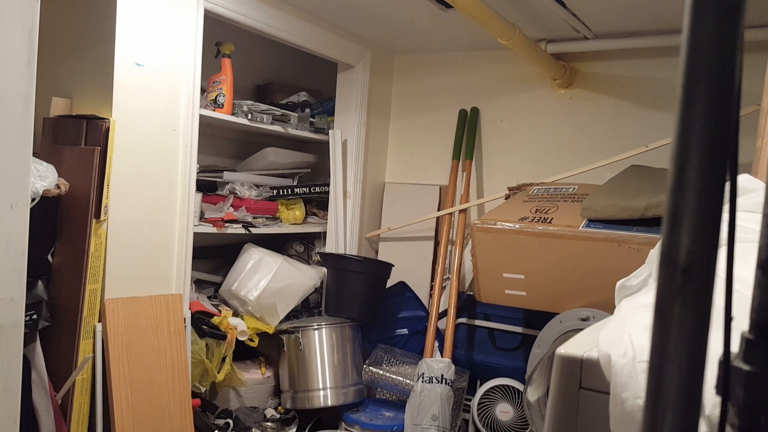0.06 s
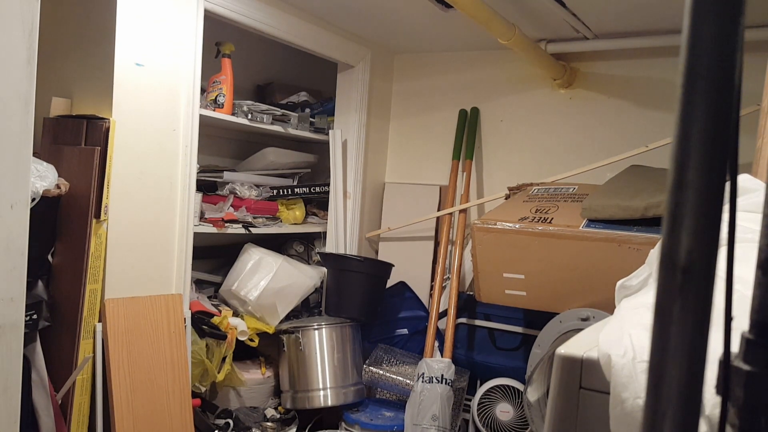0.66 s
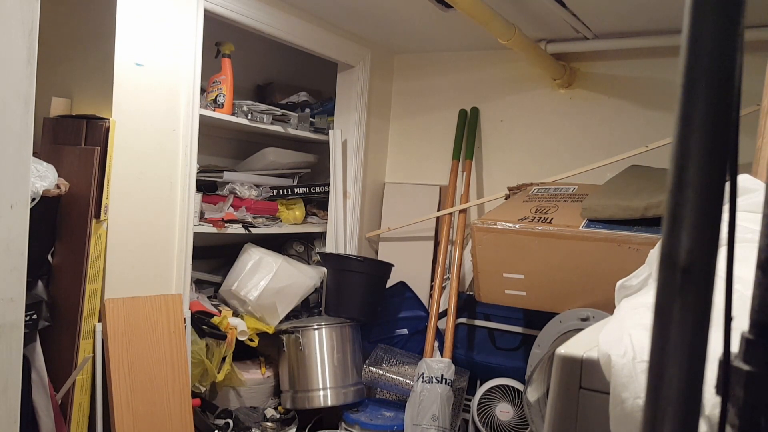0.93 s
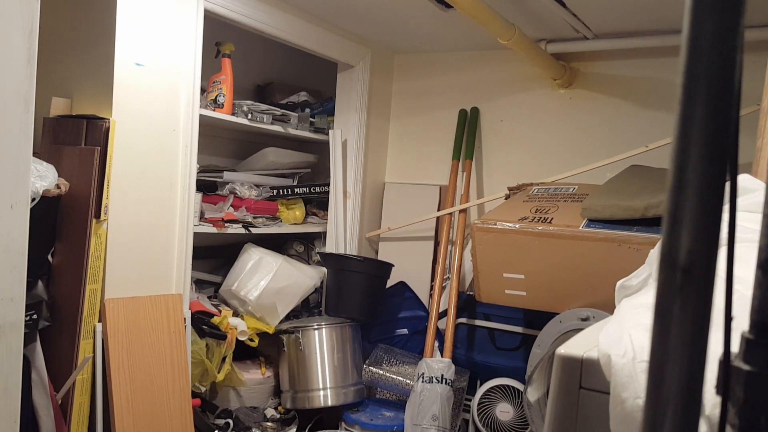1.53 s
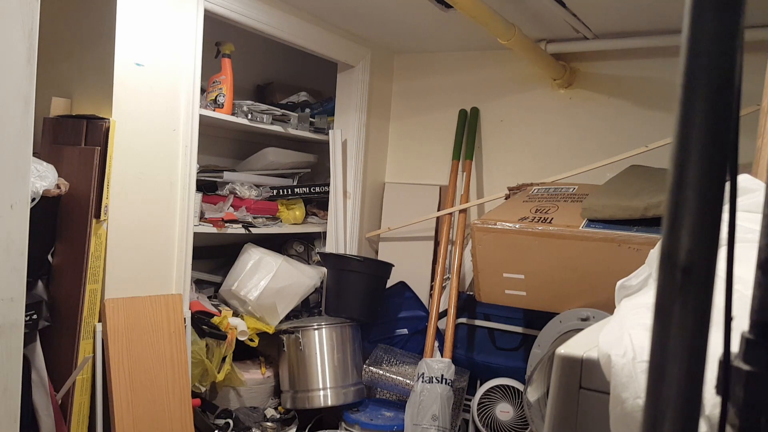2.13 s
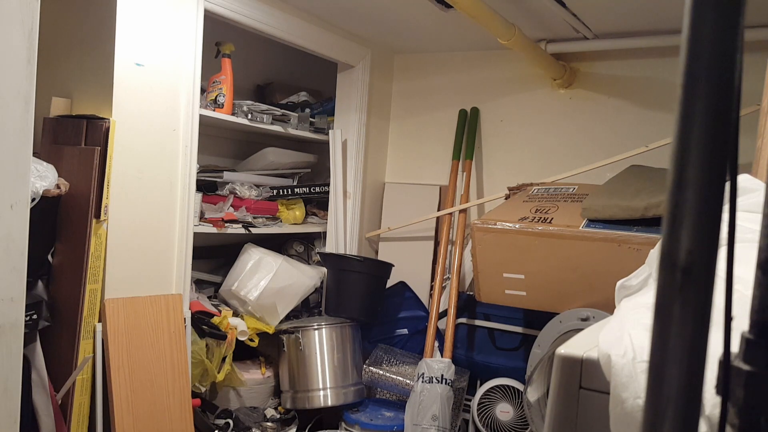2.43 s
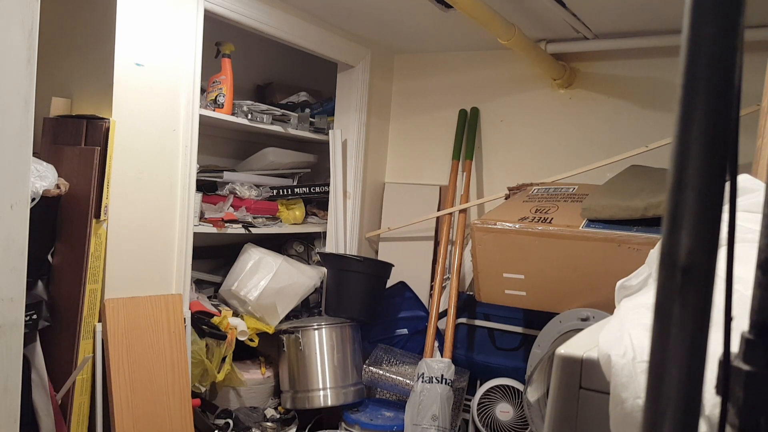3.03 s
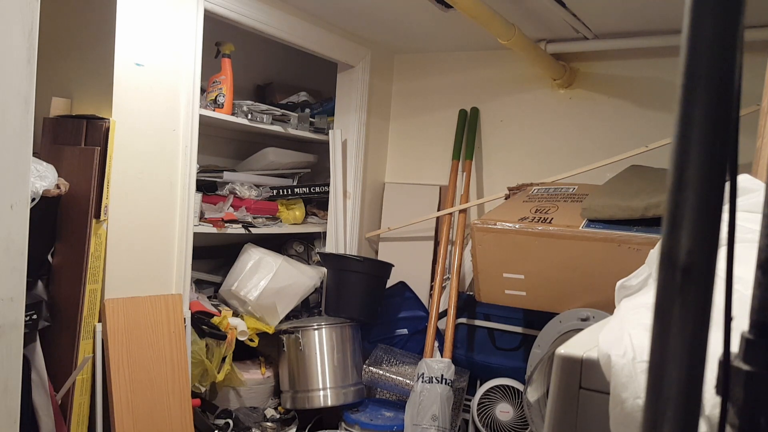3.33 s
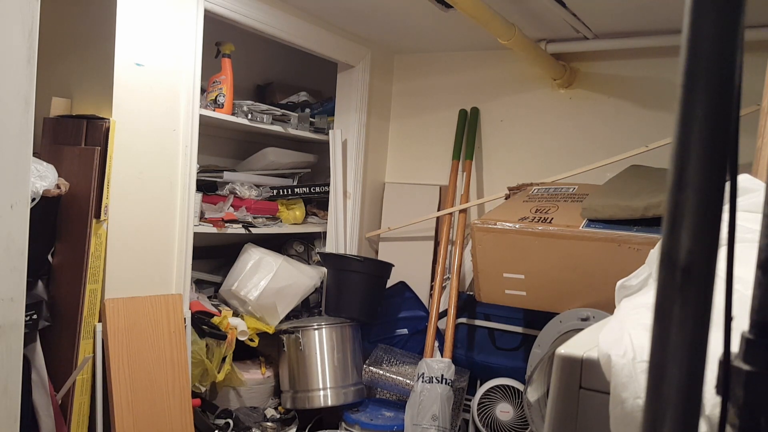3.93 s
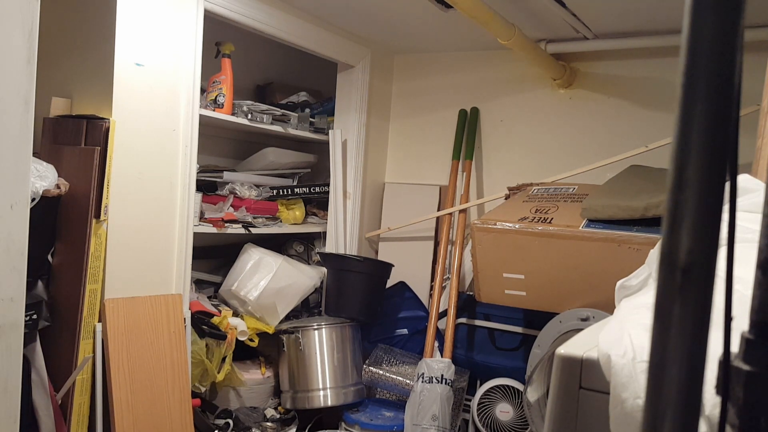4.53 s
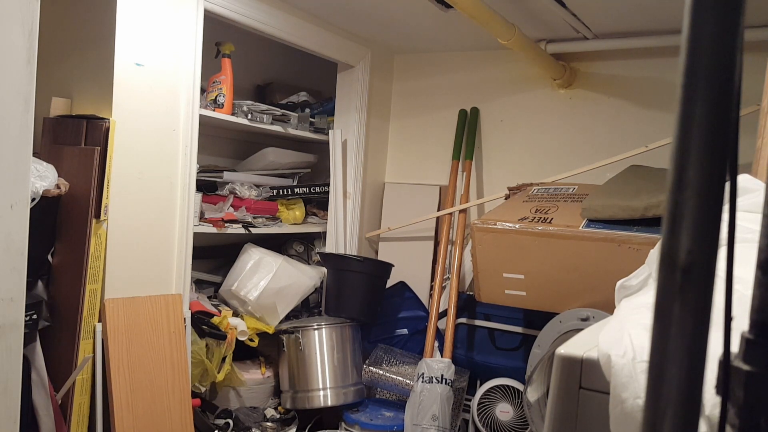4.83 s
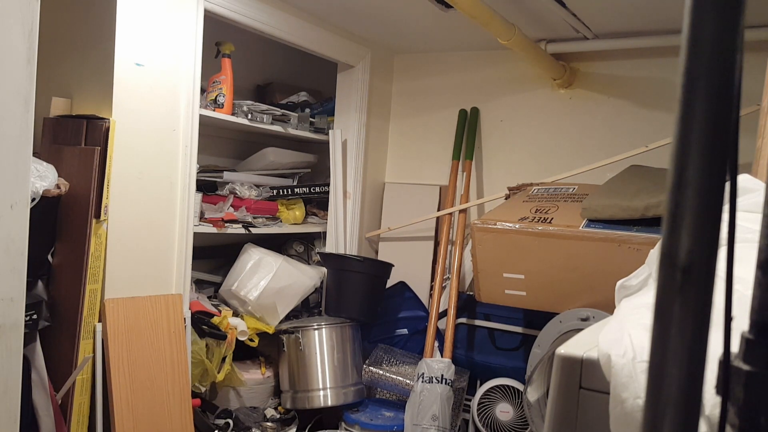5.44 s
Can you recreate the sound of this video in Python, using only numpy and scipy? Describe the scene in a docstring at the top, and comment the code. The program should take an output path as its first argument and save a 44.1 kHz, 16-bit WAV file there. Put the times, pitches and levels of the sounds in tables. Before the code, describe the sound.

Steady low rumble and hum of a laundry machine, its load thudding softly, with a faint rustle and a few ticks nearby.

```python
"""A laundry machine runs steadily in a cluttered basement.
Its tumbling load drives the cabinet into a low rumble, and impacts excite the drum's damped modes as
thuds and knocks. Panels resonate, the motor hums at harmonics of its shaft rate, air rushes under a thin
whine, and a turning part rubs twice a round. Nearby, friction makes cloth rustle early on; there are
a few faint scuffs and ticks, and later a short stick-slip scrape."""
import sys
import numpy as np
from scipy import signal
from scipy.fft import rfft, irfft
from scipy.io import wavfile
from scipy.ndimage import uniform_filter1d

SR = 44100
rng = np.random.default_rng(int(sys.argv[2]) if len(sys.argv) > 2 else 0)


def master(y):
    """Save y as 16-bit WAV."""
    cut = np.clip(np.atleast_2d(y).T, -1, 1)
    pcm = np.round(cut * 32767)  # scale
    wavfile.write(sys.argv[1], SR, pcm.astype(np.int16))


N = 250488
TIME = np.arange(N) / SR
FREQS = np.maximum(np.arange(N // 2 + 1) * SR / N, 1)


def from_db(db):
    """Amplitude ratio of a level in decibels."""
    return 10 ** (np.asarray(db) / 20)


def unit_rms(x):
    """Normalisation to an rms of 1."""
    return x / np.sqrt(np.mean(x ** 2) + 1e-20)


def over_hz(points):
    """Interpolation of (frequency, value) points on a log-frequency axis."""
    hz, value = np.transpose(points)
    return np.interp(np.log(FREQS), np.log(hz), value)


def colour(points):
    """Spectral envelope through (frequency, level) points, with steep skirts outside them."""
    skirts = np.minimum(FREQS / points[0][0], 1) * np.minimum(points[-1][0] / FREQS, 1)
    return from_db(over_hz(points)) * skirts ** 6


def pan(balance_db):
    """Channel gains for a level difference, left minus right."""
    return from_db(np.array([[.5], [-.5]]) * balance_db)


def resonance(hz, width_hz):
    """Frequency response of a damped oscillator, 1 at its peak."""
    return 1 / (1 + 1j * (FREQS ** 2 - hz ** 2) / (FREQS * width_hz))


def ringing(modes):
    """Power sum of the responses of (frequency, bandwidth, level) modes, as a gain."""
    return np.sqrt(sum(np.abs(from_db(db) * resonance(hz, width_hz)) ** 2 for hz, width_hz, db in modes))


def drift(rate_hz):
    """Random fluctuation: low-passed noise of rms 1."""
    return unit_rms(irfft(rfft(rng.standard_normal(N)) / (1 + (FREQS / rate_hz) ** 2) ** 2, N))


def swell(at, width):
    """Gaussian envelope; centre and standard deviation in seconds."""
    out, near = np.zeros(N), np.abs(TIME - at) < 6 * width
    out[near] = np.exp(-.5 * ((TIME[near] - at) / width) ** 2)
    return out


def strokes(rows):
    """Envelope of incoherent (time, width, level) strokes, which add in power."""
    return np.sqrt(sum((from_db(db) * swell(at, width)) ** 2 for at, width, db in rows))


# likeness of left and right in the room: (frequency [Hz], correlation [-1 to 1])
CORRELATION = [(60, .98), (125, .93), (160, .97), (290, .97), (400, .66), (600, .55), (900, .1),
               (1500, -.3), (2500, 0), (5000, .08), (15000, 0)]
# standing waves of the room: (frequency [Hz], phase lead of the left [rad])
PHASE_LEAD = [(45, 0.37), (85, 0.046), (108, 1), (150, 0.27), (300, 0), (370, 0), (500, 0)]
def room_noise(gain):
    """Reverberant field: shaped noise of rms 1, strongly correlated between channels only in the bass."""
    mid, side = rfft(rng.standard_normal((2, N)))
    alike = over_hz(CORRELATION)
    pair = np.sqrt(1 + alike) * mid + np.sqrt(1 - alike) * side * [[1], [-1]]
    standing_waves = np.exp(.5j * over_hz(PHASE_LEAD) * [[1], [-1]])
    return unit_rms(irfft(gain * standing_waves * pair, N))


def near_noise(gain, direct_db, lag_s=.00042):
    """Superposition of the reverberant field and a direct wave that reaches the left first; rms 1."""
    delay = np.exp(-2j * np.pi * FREQS * lag_s * [[0], [1]])
    direct = unit_rms(irfft(gain * delay * rfft(rng.standard_normal(N)), N))
    return unit_rms(room_noise(gain) + from_db(direct_db) * direct)


# brief dips of the rumble: (time [s], depth [dB])
LULLS = [(.83, 5), (1.0, 23), (3.15, 9), (3.63, 6), (4.32, 14), (4.49, 5), (5.04, 5), (5.22, 8), (5.4, 10)]
def tumble_db(roll_db=-41, swing_db=0.66, airborne_db=3, smother_db=1.5):
    """Amplitude modulation of the rumble: a random swing, dips around each fall, and a few lulls."""
    level = roll_db + swing_db * drift(9.4)
    heaviest_db = max(db for _, db, _ in THUDS)
    for at, db, _ in THUDS:
        weight = from_db(db - heaviest_db)
        level -= airborne_db * weight * swell(at - 0.06, 0.014)   # the lump is in the air
        level -= smother_db * weight * swell(at + 0.014, 0.0079)   # its landing smothers the rolling
    return level - sum(depth_db * swell(at, 0.012) for at, depth_db in LULLS)


# spectrum of cabinet and room rumble: (frequency [Hz], relative level [dB])
CABINET = [(13, -33), (22, -23.5), (68, 0.5), (86, 5), (112, -1), (142, -1), (182, -9), (221, -5),
           (269, -13), (290, -38), (380, -45), (640, -120)]
# stereo balance of rumble and air: (frequency [Hz], left minus right [dB])
BALANCE = [(105, 0), (125, 6.5), (175, 5), (250, -1.5), (500, 0), (1000, 4.5), (2200, 2), (3200, -0.4),
           (6200, 0.5), (10000, 4.5), (15000, 4)]
def rumble(steadiness=0.68, settle_s=0.0417):
    """Forced vibration: the rolling load shakes the cabinet without a break."""
    roll = room_noise(colour(CABINET) * pan(over_hz(BALANCE)))
    power = uniform_filter1d(np.mean(roll ** 2, axis=0), size=int(settle_s * SR))
    roll = roll / power ** (steadiness / 2)   # the weight of the load holds the level even
    return roll * from_db(tumble_db())


# panel and duct modes: (frequency [Hz], bandwidth [Hz], relative level [dB], left minus right [dB])
PANEL_MODES = [(87.7, 8.4, -52.5, 5), (133.3, 3.7, -52.5, 0.5), (157.7, 15, -61.5, 18.5),
               (213.7, 8.5, -52.5, 2), (245.2, 20.6, -53.5, 1.5), (384, 28, -70.5, 13.5),
               (579.4, 12, -71.5, 4.5), (820, 87, -68.5, 7), (862, 52, -66, -10), (1162, 24, -72, -3.5),
               (1280, 64, -73.5, -3), (1462, 33, -75.5, -8), (1789, 29, -74.5, 0), (2072, 43, -77.5, 3),
               (2190, 100, -76, 3.5), (2634, 27, -88, 3), (4305, 120, -80, 6), (4740, 190, -79, 2),
               (5250, 38, -83, -6), (6120, 40, -88, -2)]
def panels(level_db=1.0):
    """Resonance: under constant shaking, sheet metal and ducts ring in narrow bands."""
    power = 0
    for hz, width_hz, db, balance_db in PANEL_MODES:
        shape = np.abs(resonance(hz, 1.5 * width_hz)) ** 4   # 1.5 offsets the narrowing by the exponent
        power = power + shape / shape.mean() * (from_db(db) * pan(balance_db)) ** 2
    return from_db(level_db) * np.sqrt(power.mean()) * room_noise(np.sqrt(power))


# motor and fan tones: (order [shaft rates, rounded when played], rms level [dB], left minus right [dB])
HARMONICS = [(4, -53.5, 0.5), (8, -58.5, 5), (11.9, -57, 0.5), (13, -65, -7), (16, -74.5, 5), (20, -74, 9),
             (24, -77, -18.5), (32, -68.5, 9), (40, -66, -9), (44, -69, -7), (48, -77.5, -25),
             (59, -75.5, -9.5)]
def motor(shaft_hz=24.5, wander=0.00038, flutter_db=.7):
    """Harmonics of the shaft rotation; room paths give each a phase difference between left and right."""
    turns = np.cumsum(shaft_hz * (1 + wander * drift(2.1))) / SR
    out = np.zeros((2, N))
    for order, db, balance_db in HARMONICS:
        alike = np.interp(order * shaft_hz, *np.transpose(CORRELATION))
        offset = np.arccos(alike) * np.array([[.5], [-.5]])
        tone = np.sin(2 * np.pi * (round(order) * turns + rng.random()) + offset)
        out += np.sqrt(2) * tone * pan(balance_db) * from_db(db + flutter_db * drift(6.5))
    return out


def duct_ripple(depth_db=2.5, spacing_hz=25):
    """Modal overlap: crowded higher modes of the duct leave a fine, static ripple on the treble."""
    ripple = unit_rms(uniform_filter1d(rng.standard_normal(len(FREQS)), size=int(spacing_hz * N / SR)))
    return from_db(depth_db * ripple * np.minimum(FREQS / 1500, 1))


# spectrum of the airflow: (frequency [Hz], relative level [dB])
AIR = [(190, -28), (330, -3), (400, -3), (450, -6.5), (536, -7), (576, -6.5), (739, -5.5), (841, -1.5),
       (920, -6), (1010, -10), (1470, -8.5), (1650, -16.5), (2120, -14.5), (2920, -21.5), (4370, -25),
       (5600, -27), (7280, -66), (12300, -120)]
# spectrum of the thin hiss: (frequency [Hz], relative level [dB])
HISS = [(4000, 1.5), (5700, -6.5), (6250, 5), (7200, -1.5), (8200, -2.5), (10500, -3), (12700, -1.5),
        (14500, -2), (17000, -9)]
# the hiss eases off: (time [s], level [dB])
HISS_LEVEL = [(0, -66.5), (1.5, -68), (5.68, -69)]
def air(rush_db=-53.0):
    """Broadband flow noise: the fan drives air through its duct, with a faint hiss on top."""
    duct = pan(over_hz(BALANCE)) * duct_ripple()
    rush = from_db(rush_db) * room_noise(colour(AIR) * duct)
    hiss_db = np.interp(TIME, *np.transpose(HISS_LEVEL))
    return rush + from_db(hiss_db) * near_noise(colour(HISS) * duct, direct_db=-9.0)


def whine(level_db=-83.0, hz=13228, waver_hz=33, flutter_db=1.0):
    """Random frequency modulation: a thin, very high tone on the left wavers quickly."""
    tone = np.sqrt(2) * np.sin(2 * np.pi * np.cumsum(hz + waver_hz * drift(70)) / SR)
    return tone * from_db(level_db + flutter_db * drift(60)) * pan(balance_db=18)


def blows(rows, modes, level_db, vary_db):
    """Modal superposition: after each soft impact the modes build up and die away."""
    out, age = np.zeros(N + SR), np.arange(SR // 4) / SR
    for at, db, hz in rows:
        start = round(at * SR)
        for ratio, rise_s, mode_db in modes:
            shape = age / rise_s * np.exp(1 - age / rise_s)
            strength = from_db(level_db + db + mode_db + vary_db * (ratio - 0.5) * rng.normal())
            out[start:start + len(age)] += strength * shape * np.sin(2 * np.pi * ratio * hz * age)
    return out[:N]


# heavy falls of the load: (time [s], relative level [dB], pitch [Hz])
THUDS = [(0.005, -34, 99), (0.088, -32.5, 88), (0.292, -33, 93), (0.542, -38, 87), (0.872, -31, 86.4),
         (0.911, -28, 94), (1.044, -33.5, 92), (1.16, -34, 93), (1.548, -28.5, 92), (1.826, -33, 94),
         (1.89, -29.5, 96), (1.995, -32.5, 94.5), (2.108, -35.5, 92), (2.309, -35, 78.4), (2.374, -32, 95),
         (2.659, -30.5, 96), (2.797, -31, 85.6), (3.4, -32, 100), (3.478, -33, 89.6), (3.693, -29.5, 86),
         (3.809, -36, 92), (4.057, -33, 83), (4.217, -31, 88), (4.847, -34, 89), (5.13, -28, 90.5),
         (5.492, -38.5, 96), (5.556, -39, 81.2), (5.643, -32.5, 95)]
# drum modes: (frequency [multiple of the pitch], rise time [s], relative level [dB])
DRUM_MODES = [(.97, 0.0083, -0.5), (1.5, 0.011, -12), (2.4, 0.0054, -14)]
def thuds():
    """Impact excitation: heavy lumps of laundry land and ring the drum's low modes."""
    return blows(THUDS, DRUM_MODES, level_db=0.0, vary_db=1.0)


# soft contacts: (time [s], width [s], level [dB], centre frequency [Hz], spread [octaves])
SCUFFS = [(.1, 0.012, -60, 2750, 0.2), (.61, .025, -64, 2400, 0.27), (1.14, .018, -64, 2300, .35),
          (3.195, 0.022, -60.5, 2280, 0.35), (4.992, 0.016, -66, 7000, 0.58)]
def scuffs(room_t60=0.39):
    """Reverberation: brief contacts leave an exponential tail, stronger the longer they feed the room."""
    out = np.zeros((2, N))
    for at, width, db, hz, octaves in SCUFFS:
        filled = np.sqrt(width / .02)
        tail = (TIME > at) * filled * from_db(-60 * np.abs(TIME - at) / room_t60)
        band = np.exp(-.25 * (np.log2(FREQS / hz) / octaves) ** 2)
        out += from_db(db) * np.hypot(swell(at, width), tail) * room_noise(band)
    return out * pan(balance_db=1.0)


# slides of cloth: (time [s], width [s], relative level [dB], spectral tilt [dB/octave])
RUSTLES = [(.305, 0.029, -61, -1), (.60, 0.047, -59.5, 0.8), (1.135, 0.026, -64, 3),
           (1.255, 0.041, -59, 1.2), (1.39, 0.043, -59.5, 2), (1.33, 0.35, -64, 0.5), (3.21, 0.056, -65, 2)]
# spectrum of the cloth: (frequency [Hz], relative level [dB])
CLOTH = [(900, 17.5), (2200, 11), (3500, 4.5), (6000, -1.5), (9000, -4), (12000, -3), (15500, -7)]
def cloth(level_db=2.0, grain_db=1.2, treble_left_db=9.0):
    """Friction noise: fibres catch and slip in strokes whose treble comes from the left."""
    fibres = colour(CLOTH) * pan(treble_left_db * np.minimum(FREQS / 12000, 1))
    slides = np.zeros((2, N))
    for at, width, db, tilt_db in RUSTLES:
        tilt = from_db(tilt_db * np.log2(FREQS))
        slides += from_db(db) * swell(at, width) * near_noise(fibres * tilt, direct_db=-8.5)
    return slides * from_db(level_db + grain_db * drift(200))


# two rubs and the light drag around them: (time in the round [s], width [s], relative level [dB])
RUBS = [(0.32, 0.012, -62), (0.37, 0.013, -62.5), (0.36, 0.066, -68.5)]
# spectrum of the rubbing: (frequency [Hz], relative level [dB])
RUB_SPECTRUM = [(900, 6), (2400, 6), (4000, 1.5), (5700, 2), (6400, 5), (7100, -1.5), (7800, 1.5),
                (10000, -1), (12500, -4.5), (15500, -18)]
# modes of the rubbed metal: (frequency [Hz], bandwidth [Hz], level above the plain rubbing [dB])
METAL_MODES = [(965, 60, 16), (2740, 37, 12.5), (4070, 150, 4), (5200, 100, 7), (6820, 120, 3),
               (7460, 100, 5)]
def brushing(round_s=.3838, level_db=3.0, vary_db=2.0, grain_db=0.9):
    """Periodic friction: a turning part rubs at two close spots a round and makes the metal sing."""
    starts = np.arange(0, TIME[-1], round_s)
    rows = [(start + at, width, db + rng.normal(0, vary_db))
            for start in starts for at, width, db in RUBS]
    spectrum = colour(RUB_SPECTRUM) * np.hypot(1, ringing(METAL_MODES))
    rubbing = near_noise(spectrum * pan(balance_db=4.0), direct_db=-3.5)
    return strokes(rows) * from_db(level_db + grain_db * drift(600)) * rubbing


# falls of lighter items: (time [s], relative level [dB], pitch [Hz])
KNOCKS = [(0.391, -38, 162), (0.559, -40, 179), (0.693, -43, 164), (1.22, -37, 220), (1.28, -38.5, 214),
          (1.395, -39, 213), (1.636, -33, 187), (2.214, -33, 185), (2.435, -34, 168), (2.565, -38, 173),
          (2.679, -28.5, 164), (3.329, -34, 148), (4.072, -36, 164), (4.232, -37, 190), (4.692, -35, 193),
          (4.861, -36.5, 159), (4.931, -42, 160), (5.137, -36, 188), (5.291, -36, 193), (5.657, -33, 203)]
# drum wall modes: (frequency [multiple of the pitch], rise time [s], relative level [dB])
WALL_MODES = [(.8, .011, -3.5), (1.3, 0.0076, -6.5)]
def knocks():
    """Impact excitation: lighter items strike the drum wall and ring it at a higher pitch."""
    return blows(KNOCKS, WALL_MODES, level_db=-0.4, vary_db=1.2) * pan(balance_db=3.5)


# sharp contacts: (time [s], level [dB], low-pass corner of the crack [Hz])
TICKS = [(0.4195, -46.5, 15000), (3.2105, -53, 13000), (4.247, -53, 14000)]
# spectrum of the crack: (frequency [Hz], relative level [dB])
CRACK = [(1000, 4), (1700, 8), (3100, 11), (4600, 3), (6000, -2), (10000, 1), (15000, 1)]
# modes of the ticking object: (frequency [Hz], bandwidth [Hz], relative level [dB])
TICK_MODES = [(2500, 200, 1), (3100, 330, 1), (4600, 700, -7), (6300, 600, -12)]
def ticks(crack_t60=0.016, ring_db=-9, ring_t60=0.1):
    """Transient and free decay: each small contact gives a broadband crack, then a short ring."""
    out, modes = np.zeros((2, N)), room_noise(ringing(TICK_MODES))
    for at, db, corner_hz in TICKS:
        age = np.maximum(TIME - at, 0)
        spectrum = colour(CRACK) / np.hypot(1, (FREQS / corner_hz) ** 2)
        crack = from_db(-60 * age / crack_t60) * near_noise(spectrum, direct_db=-8.5)
        ring = from_db(ring_db - 60 * age / ring_t60) * modes
        out += from_db(db) * (TIME > at) * (crack + ring)
    return out


# slips of a shifted object: (time [s], width [s], level [dB])
SLIPS = [(4.982, 0.01, -59), (4.996, 0.007, -50.5), (5.010, 0.0086, -51.5), (5.028, 0.012, -57)]
# its modes: (frequency [Hz], bandwidth [Hz], relative level [dB])
SCRAPE_MODES = [(1455, 90, 2.5), (1883, 130, 0), (2200, 160, -7), (2440, 160, -1), (2730, 220, -9),
                (3330, 260, -15), (3780, 280, -13), (4200, 200, -21)]
def scrape(grain_db=2.5):
    """Stick-slip friction: a hard object shifts in a few jerks that excite its modes."""
    envelope = strokes(SLIPS) * from_db(grain_db * drift(250))
    return envelope * room_noise(ringing(SCRAPE_MODES) * pan(balance_db=2.0))


def scene():
    """Linear superposition of the machine and the small sounds around it."""
    steady = rumble() + panels() + motor() + air() + whine()
    return steady + thuds() + scuffs() + cloth() + brushing() + knocks() + ticks() + scrape()


def record(dry, low_cut_hz=36, high_cut_hz=15750, fade_s=.002):
    """Band limiting: the microphone drops the deepest bass, the ends fade and the top is cut steeply."""
    high_pass = signal.butter(4, low_cut_hz, "high", fs=SR, output="sos")
    low_pass = signal.ellip(12, .1, 80, high_cut_hz, fs=SR, output="sos")
    fades = np.minimum(np.minimum(TIME, TIME[::-1]) / fade_s, 1)
    return signal.sosfilt(low_pass, signal.sosfilt(high_pass, dry) * fades)


dry = scene()
out = record(dry)
master(out)
```